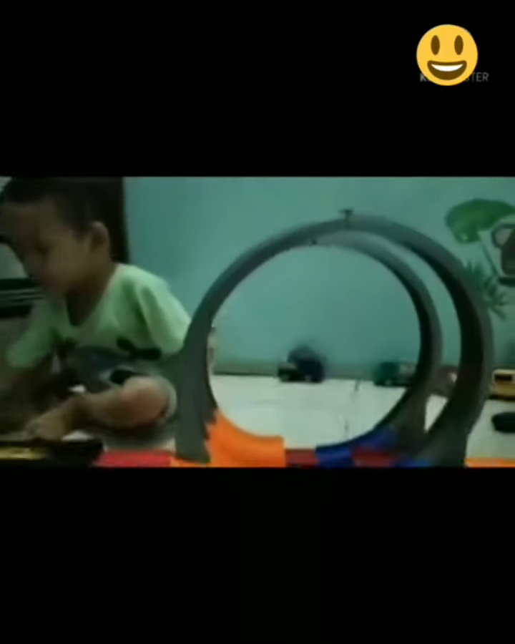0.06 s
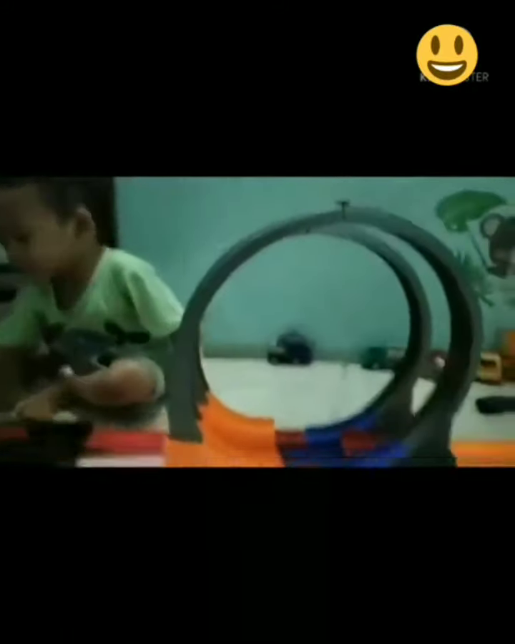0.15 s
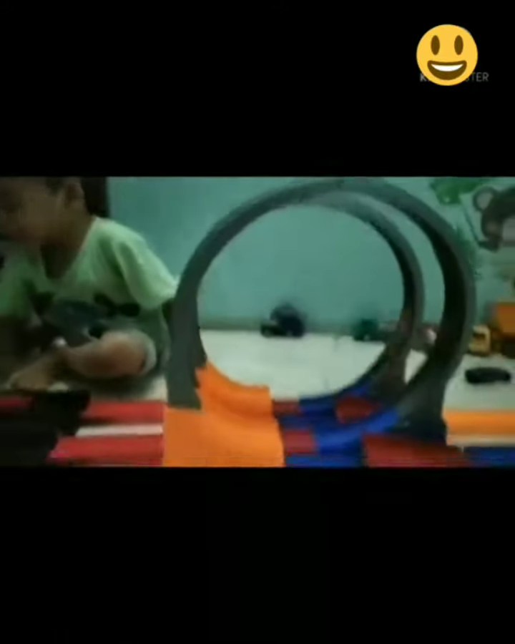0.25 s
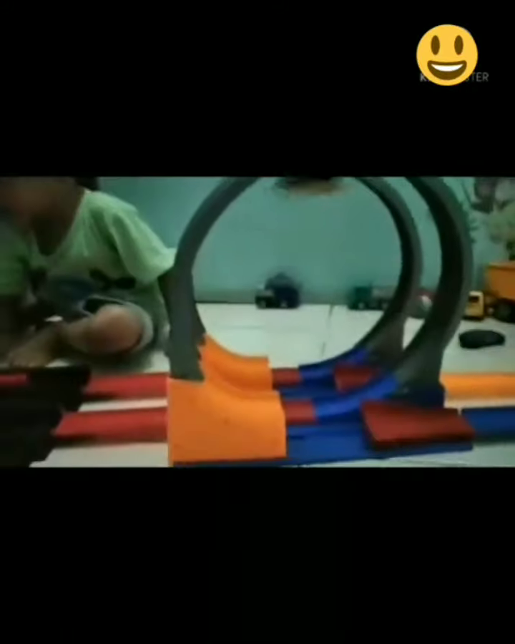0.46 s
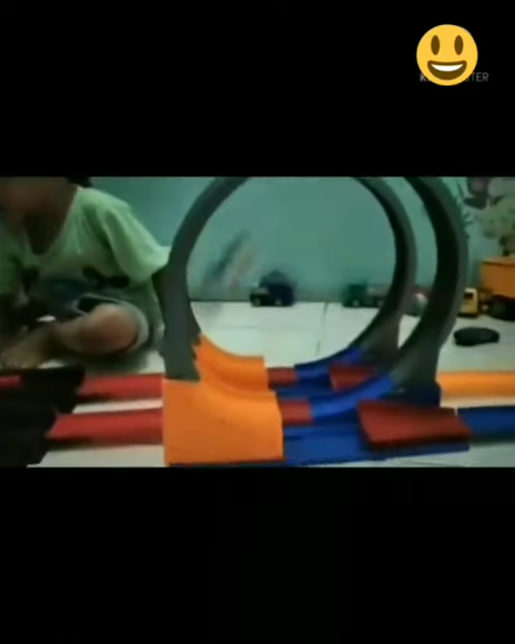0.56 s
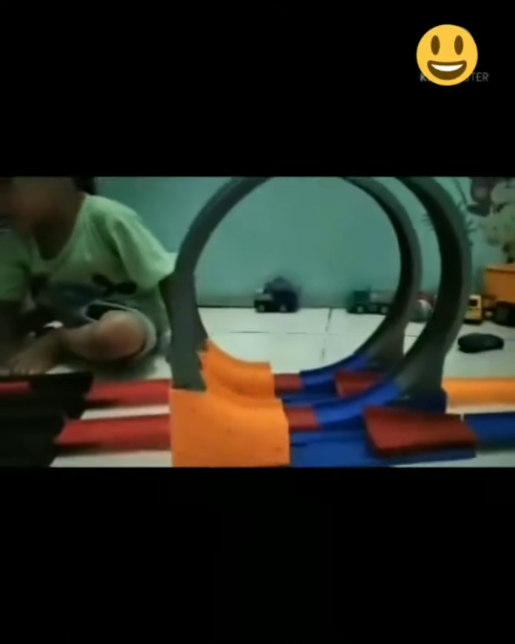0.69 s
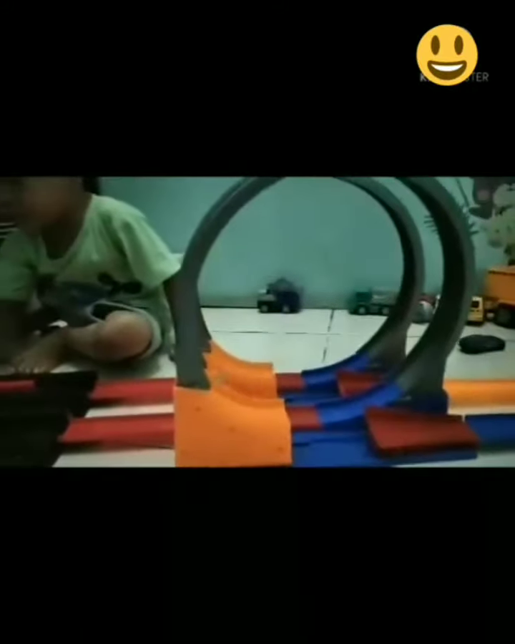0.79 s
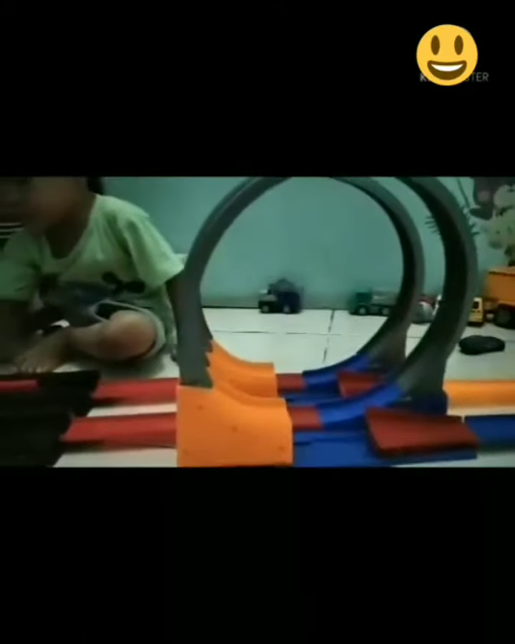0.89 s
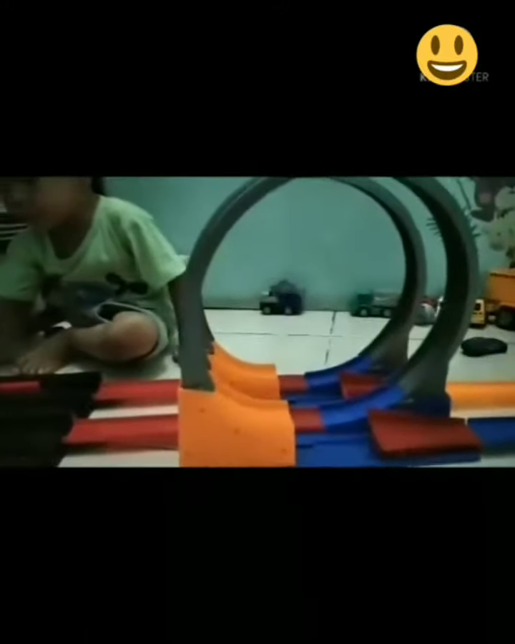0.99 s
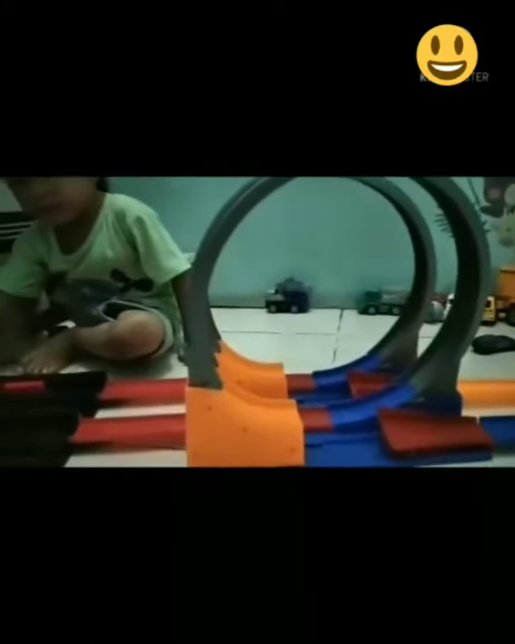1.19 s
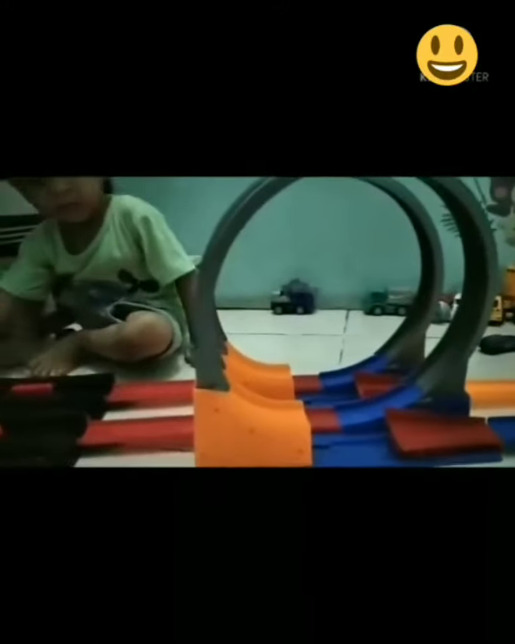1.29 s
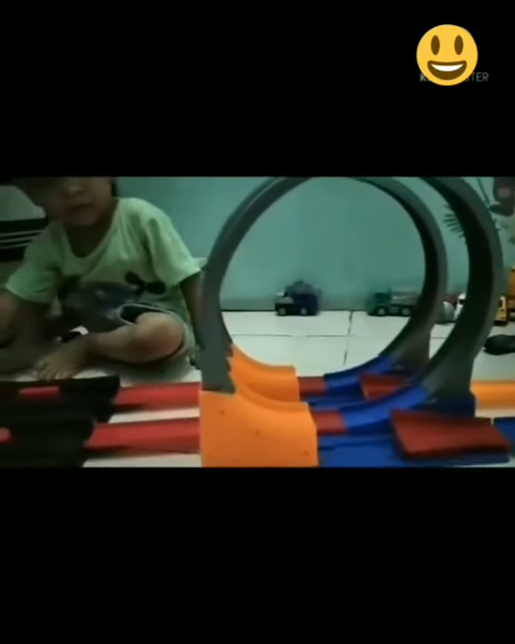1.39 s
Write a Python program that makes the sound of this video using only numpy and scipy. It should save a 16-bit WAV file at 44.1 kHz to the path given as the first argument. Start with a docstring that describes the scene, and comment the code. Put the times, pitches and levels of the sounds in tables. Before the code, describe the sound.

Sharp hollow plastic clacks and a brief buzzing wheel rattle run round a toy loop track, thin out, then a bright crash, skid and weakening ticks follow; close microphones, tiled room, faint low hum.

```python
"""A toy car is launched round a plastic loop track on a tiled floor in a small, hard room.
The launcher snaps, the wheels rattle over the joints and fade; then the car drops, clatters and bounces
to rest. Bursts of tiny contacts make the blows, ticks and pings make the rolling, and dying sines ring
in track and car. Two microphones hear more direct sound than room, over shaped noise and a low hum."""
import sys
import numpy as np
from scipy import signal
from scipy.fft import rfft, irfft
from scipy.io import wavfile
from scipy.ndimage import uniform_filter1d

SR = 44100
rng = np.random.default_rng(int(sys.argv[2]) if len(sys.argv) > 2 else 0)


def put_to_file(sound):
    """Save the sound as 16-bit audio at rate SR, in the file named by the first command-line argument."""
    columns = np.atleast_2d(sound).T  # one column per channel
    safe = np.clip(columns, -1, 1)
    whole_steps = np.round(safe * 32767)
    wavfile.write(sys.argv[1], SR, whole_steps.astype(np.int16))


N = 63945

# Centres of the thud, clack, reference and tick bands that colour a blow: [Hz] each
BLOW_BANDS_HZ = (650, 1500, 3400, 8000)
BLOW_DB = 3.5  # added to the level of every blow, on the track or of the car


def amp(db):
    """Decibels to gain."""
    return 10 ** (np.asarray(db) / 20)


def unit(x):
    """Scales to rms 1."""
    return x / np.sqrt(np.mean(x ** 2) + 1e-20)


def read(points, hz):
    """Reads a table on a log-frequency axis."""
    f, value = np.transpose(points)
    return np.interp(np.log(hz + 1), np.log(f + 1), value)


def pan(db):
    """Left and right gains for a left-over-right difference in dB."""
    return amp(np.array([[.5], [-.5]]) * db)


def pair(x, same):
    """Makes two unrelated channels partly alike by leaking each into the other."""
    angle = np.arcsin(np.clip(same, -1, 1)) / 2
    return np.cos(angle) * x + np.sin(angle) * x[::-1]


def colour(x, points, size=4096):
    """Causal (minimum-phase) filter that follows a (Hz, dB) table."""
    hz = abs(np.fft.fftfreq(size, 1 / SR))
    log_gain = np.log(amp(read(points, hz)))
    spectrum = np.exp(np.conj(signal.hilbert(log_gain)))
    taps = np.fft.ifft(spectrum).real[:size // 2]
    return signal.fftconvolve(x, taps[None], axes=1)[:, :x.shape[1]]


def add(mix, s, sound):
    """Mixes a sound in at a time in seconds."""
    part = mix[:, round(s * SR):][:, :sound.shape[1]]
    part += sound[:, :part.shape[1]]


def rings(x, modes):
    """Adds dying sines, given as (Hz, gain dB, t60 s), to the sound that excites them."""
    t = np.arange(SR // 4) / SR
    ring = np.zeros(len(t))
    for hz, db, t60 in modes:
        decay = amp(db - 60 * t / t60)
        resonant_gain = 2 * np.log(1000) / (t60 * SR)  # brings the peak of each ring to its gain
        ring += decay * resonant_gain * np.cos(2 * np.pi * hz * t)
    return x + signal.fftconvolve(x, ring[None], axes=1)[:, :x.shape[1]]


def background():
    """Shaped noise is the room's air, a narrow noise band its wavering hum; the lows lean left."""
    # Room air: (frequency [Hz], relative density [dB per Hz])
    air_density = [(15, -72), (25, -46), (58, -11.5), (72, -11), (96, -6), (144, -11), (208, -7.5),
                   (301, -8), (335, -14.5), (403, -18.5), (761, -21), (916, -19.5), (1330, -23),
                   (2640, -24.5), (14000, -41)]
    # Lean of the air: (frequency [Hz], left over right [dB])
    air_lean = [(30, 8), (130, 13), (280, 13.5), (600, -1), (4000, 3), (12000, 3)]
    air_db, air_same = -38.5, 0.23
    hum_hz, hum_width_hz, hum_db, hum_lean_db = 138, 22, -44.5, 10

    hz = np.fft.rfftfreq(N, 1 / SR)
    air = rfft(pair(rng.standard_normal((2, N)), air_same))
    air = irfft(air * amp(read(air_density, hz)) * pan(read(air_lean, hz)), N)
    hum_band = 1 / (1 + ((hz - hum_hz) / hum_width_hz * 2) ** 2)
    hum = irfft(rfft(rng.standard_normal(N)) * hum_band, N)
    return amp(air_db) * unit(air) + amp(hum_db) * unit(hum * pan(hum_lean_db))


def pings(count=48, size=2048):
    """Here and there a wheel rings one spot of the plastic at its own pitch."""
    low_hz, high_hz = 1000, 7000
    pings_per_s, decay_s = 600, 0.0075  # the rate is shared by all spots
    level_db, spread_db = -3.5, 2.5  # level against the ticks, spread between pings

    out, t = np.zeros((2, N)), np.arange(size) / SR
    for hz in rng.uniform(low_hz, high_hz, count):
        struck = rng.random(N) < pings_per_s / count / SR
        hits = struck * amp(spread_db * np.minimum(rng.exponential(1, N), 3))
        phase = rng.random((2, 1))  # in cycles, one for each side
        ping = np.sin(2 * np.pi * (hz * t + phase)) * np.exp(-t / decay_s)
        out += signal.oaconvolve(hits[None], ping, axes=1)[:, :N]
    return amp(level_db) * unit(out)


def rattle(levels):
    """Small hard wheels on plastic: dense, uneven ticks of either sign, mixed with pings."""
    ticks_per_s, spread_db = 1500, 1  # on each side
    roll_db, lean_db = -1.5, 3  # lean: left over right

    ticks = rng.standard_normal((2, N)) * (rng.random(N) < ticks_per_s / SR)
    ticks = np.sign(ticks) * amp(spread_db * np.minimum(rng.exponential(1, N), 4))
    level_db = np.interp(np.arange(N) / SR, *np.transpose(levels), left=-100, right=-100)
    return unit(unit(ticks) + pings()) * amp(roll_db + level_db) * pan(lean_db)


def wheels():
    """The rolling thins out as the car leaves the floor and climbs the loop; later the fallen car skids."""
    # Wheels on the track: (time [s], level [dB])
    run_levels = [(.214, -60), (.222, -30), (.238, -24.5), (.244, -13.5), (.28, -14.5), (.31, -20.5),
                  (.345, -14.5), (.37, -17.5), (.43, -17), (.47, -13), (.5, -18), (.535, -21.5),
                  (.575, -20), (.61, -35), (.66, -33.5), (.74, -35), (.76, -65)]
    # Skids of the fallen car: (time [s], level [dB])
    skid_levels = [(.75, -29), (.78, -22), (.86, -17), (.9, -37), (.95, -67), (1.02, -57), (1.06, -29),
                   (1.1, -44), (1.14, -27), (1.18, -38), (1.24, -32.5), (1.29, -55), (1.37, -41.5),
                   (1.44, -75)]
    # Colours of the straight, high in the loop and in the skid: (frequency [Hz], gain [dB])
    straight_tone = [(60, -4), (250, 5), (600, 4.5), (1400, 1.5), (2500, 1.5), (4300, 2.5), (8500, 7.5),
                     (14000, 6.5)]
    loop_tone = [(100, -11), (600, -7), (1400, -6.5), (2450, -3), (3200, -4.5), (4300, -6.5), (8500, 3),
                 (14000, 1.5)]
    skid_tone = [(100, -6), (600, 5.5), (1400, -2), (3200, 2), (8500, 8), (14000, -2)]
    loop_s, climb_s = 0.42, 0.076  # middle and pace of the climb

    roll = rattle(run_levels)
    height = .5 + .5 * np.tanh((np.arange(N) / SR - loop_s) / climb_s)
    on_straight = colour(roll * (1 - height), straight_tone)
    in_loop = colour(roll * height, loop_tone)
    return on_straight + in_loop + colour(rattle(skid_levels), skid_tone)


def room(x, size=256):
    """Dense reflections off tiles and bare walls: noise that dies at its own rate in each band."""
    # Reverberation: (frequency [Hz], t60 [s])
    decay_times = [(150, 0.26), (600, 0.41), (1700, 0.46), (4500, 0.62), (9000, 0.45), (14000, 0.56)]
    room_db, delay_s = -6, 0.0025  # silent for the delay, then rising for as long again

    hz, t, z = signal.stft(rng.standard_normal((2, SR)), SR, nperseg=size)
    decay = amp(-60 * t / read(decay_times, hz)[:, None])
    tail = signal.istft(z * decay, SR, nperseg=size)[1]
    tail = tail * np.clip(np.arange(tail.shape[1]) / SR / delay_s - 1, 0, 1)
    wet = signal.fftconvolve(x, tail / np.linalg.norm(tail[0]), axes=1)[:, :N]
    return wet * amp(room_db)


def blow(release_s, size=4096, order=24):
    """Loose parts chatter for a few ms: a burst of tiny contacts that excites all frequencies evenly."""
    attack_s, contacts_per_s = 0.0024, 6000

    t = np.arange(size) / SR
    shape = np.minimum(t / attack_s, 1) * np.exp(-np.maximum(t - attack_s, 0) / release_s)
    contacts = rng.standard_normal((2, size)) * (rng.random((2, size)) < contacts_per_s / SR)
    z = rfft(shape * contacts, 2 * size)
    power = uniform_filter1d(abs(z) ** 2, order, axis=1)
    burst = irfft(z / np.sqrt(power + 1e-12))[:, :size]  # evens out the spectrum
    return unit(burst) * np.sqrt(np.mean(shape ** 2))


def knocks():
    """Blows on the track, each with the hollow note of its spot, a short resonance."""
    # Blows: (time [s], level [dB], thud [dB], clack [dB], tick [dB], left over right [dB],
    # note [Hz], note gain [dB], release [s])
    track_blows = [ (0.2403, -10.5, 8.5, -0.5, 6.5, 4, 1010, 0, 0.0034),
                   (0.244, -6, -0.5, -1, -2, -5, 382, 8.5, 0.0085),
                   (.256, -1, -4.5, -10.5, -4.5, 2.5, 974, 8, 0.0053),
                   (.263, -4.5, -7.5, -7.5, -8, 6, 735, 2, 0.0079),
                   (0.289, -16, 1.5, -18, 6, -3, 391, 8, 0.01),
                   (.375, -9.5, -10, 2.5, 6, -2.5, 1364, 11, 0.011),
                   (0.3795, -10.5, -16.5, 7, -1, 6.5, 4340, 15.5, .003),
                   (0.3865, -26.5, -12, 12, 4.5, 10, 8400, 17.5, 0.0016),
                   (0.414, -9.5, -18, -0.5, 2.5, -5.5, 1350, -17, 0.0052),
                   (.419, -13.5, -11, -3, 4.5, 9, 4400, 7, 0.0084),
                   (.440, -17.5, 1, -6, 10.5, -1, 4330, 11.5, 0.0043),
                   (.465, -20, -7, 1, -4, -2, 2420, 13.5, 0.0079),
                   (.475, -20.5, -17, -4, -3, -3, 2410, 16.5, 0.0053),
                   (.501, -22.5, -2.5, -1, -7, -2, 2370, 8, 0.0072),
                   (.570, -15.5, -13, -24, -10, 4, 2300, 11, 0.0066),
                   (.673, -33, 0, -12, 1, 1, 2940, 8, 0.0073), (0.8294, -8.5, 5, 4, 3, -1, 930, -1, 0.0059),
                   (0.842, -18.5, 4, 7, -12, -2, 409, 14.5, 0.0045),
                   (.8555, -8.5, 3, 0, 3.5, 2, 2020, 4, 0.0056),
                   (.872, -11.5, 4.5, 0, 4, 2.5, 593, 0.5, 0.0057),
                   (.881, -16, 4, 7.5, 2, 2, 790, -5, 0.0029),
                   (0.976, -18.5, -3, 1, 2, 1.5, 1900, -20, 0.0082),
                   (1.027, -23, 2, -2, 3, -2, 1570, 7, 0.016),
                   (1.035, -16.5, 3.5, 3.5, -1.5, 1.5, 1570, 5.5, 0.007),
                   (1.042, -9, 0.5, 1, -0.5, 3.5, 956, 8.5, 0.0066),
                   (1.111, -15.5, -4.5, -12, 4, 5.5, 1080, 16, 0.0045),
                   (1.125, -21.5, 2, 6, 7, -1.5, 995, 8, 0.0054),
                   (1.141, -24, -12, -20, 9.5, 3, 9140, 8.5, 0.0022),
                   (1.194, -29.5, 5, -4, 4.5, 8.5, 8800, -4, .003),
                   (1.228, -30, 5.5, 5, -1, 4, 835, 1, 0.004),
                   (1.328, -34.5, 3, -1, 7, 1.5, 1360, 3, 0.011),
                   (1.344, -32.5, -1, -25, 0.5, 1, 3030, 2.5, 0.02)]
    note_q = 11

    out = np.zeros((2, N))
    for s, db, thud_db, clack_db, tick_db, lean_db, hz, note_db, release_s in track_blows:
        note_t60 = np.log(1000) / np.pi * note_q / hz
        hollow = rings(blow(release_s), [(hz, note_db, note_t60)])
        tone = list(zip(BLOW_BANDS_HZ, (thud_db, clack_db, 0, tick_db)))
        add(out, s, colour(hollow, tone) * amp(db + BLOW_DB) * pan(lean_db))
    return out


def bumps(size=4096):
    """The whole track bumps the floor: a soft, low push that dies within a cycle or two."""
    # Bumps: (time [s], level [dB])
    floor_bumps = [(0.371, -34), (.825, -48)]
    bump_hz, decay_s = 68.5, 0.0087

    out, t = np.zeros((2, N)), np.arange(size) / SR
    push = np.sin(2 * np.pi * bump_hz * t) * np.exp(-t / decay_s)
    for s, db in floor_bumps:
        add(out, s, amp(db) * push * np.ones((2, 1)))
    return out


def car():
    """The falling car strikes with its hard body, which rings brightly as it tumbles."""
    # Strikes: (time [s], level [dB], thud [dB], tick [dB], release [s])
    body_hits = [(0.754, -6.5, -5, 0.5, 0.0024), (.766, -19, 7.5, 0, 0.0039),
                 (.786, -10.5, -1, 5.5, 0.0072), (.800, -8.5, -5, 4, .004)]
    # Rings of the car's body: (frequency [Hz], gain [dB], t60 [s])
    body_modes = [(600, 0.5, 0.024), (2730, 1, .03), (3300, 11.5, 0.023), (4830, 6, .05), (8100, -2, .04),
                  (9570, 2, 0.034), (10850, 10, .05)]
    clack_db = -2

    out = np.zeros((2, N))
    for s, db, thud_db, tick_db, release_s in body_hits:
        tone = list(zip(BLOW_BANDS_HZ, (thud_db, clack_db, 0, tick_db)))
        add(out, s, colour(blow(release_s), tone) * amp(db + BLOW_DB))
    return rings(out, body_modes)


def scene():
    """Car and track in the room; the two microphones hear the bass alike and the treble apart."""
    # Rings of track and car: (frequency [Hz], gain [dB], t60 [s])
    toy_modes = [(392, -14, 0.13), (519, -6, 0.052), (643, -2.5, 0.13), (738.5, 0, 0.14),
                 (810, -6.5, 0.096), (1350, -17, 0.12), (1877, -3, 0.079), (2324, -1, 0.14),
                 (2576, -5, 0.13), (3404, -18.5, .2), (10200, -22, 0.15)]
    # Colour of the thin plastic: (frequency [Hz], gain [dB])
    shell_tone = [(30, -26), (150, -29), (260, -7.5), (400, 0.5), (700, 4), (1100, 2), (2000, 2),
                  (3200, 2.5), (4700, 0.5), (5150, -7), (7000, -2), (9000, 0.5), (11000, -6.5),
                  (14000, -11)]
    # Left-right likeness of the direct sound: (frequency [Hz], likeness [0 to 1])
    likeness = [(100, 0.95), (600, 0.77), (1300, 0.21), (3000, 0.073), (14000, 0.017)]
    # Lean of the toy: (frequency [Hz], left over right [dB])
    toy_lean = [(200, 23.5), (400, 4), (660, -7), (1200, 0.5), (4000, -2.5), (8000, 0), (14000, 2)]

    hz = np.fft.rfftfreq(2 * N, 1 / SR)
    toy = colour(rings(wheels() + knocks() + car(), toy_modes), shell_tone)
    sides = pair(rfft(toy, 2 * N), read(likeness, hz))
    toy = irfft(sides * pan(read(toy_lean, hz)))[:, :N]
    return background() + toy + room(toy) + bumps()


def record(dry):
    """Soft overload on the loudest blows, a low cut, then the band limit."""
    ceiling, low_cut_hz, edge_hz = 0.95, 25, 14400

    loud = ceiling * np.tanh(dry / ceiling)
    low_cut = signal.butter(2, low_cut_hz, "highpass", fs=SR, output="sos")
    band_limit = signal.firwin(255, edge_hz, window=("kaiser", 8), fs=SR)
    return signal.oaconvolve(signal.sosfilt(low_cut, loud), band_limit[None], "same")


dry = scene()
out = record(dry)
put_to_file(out)
```